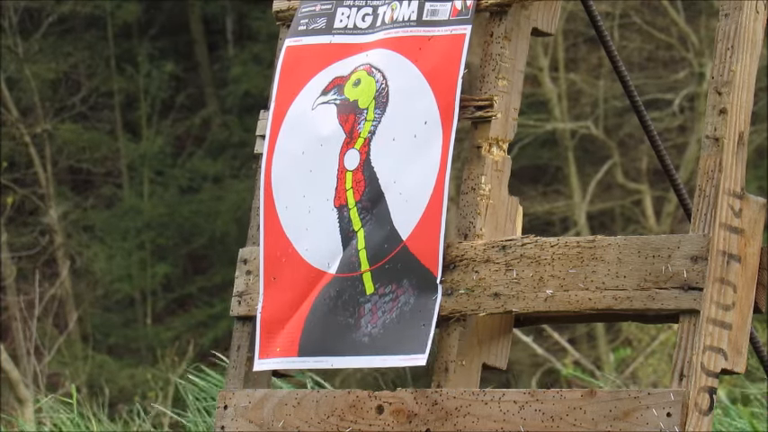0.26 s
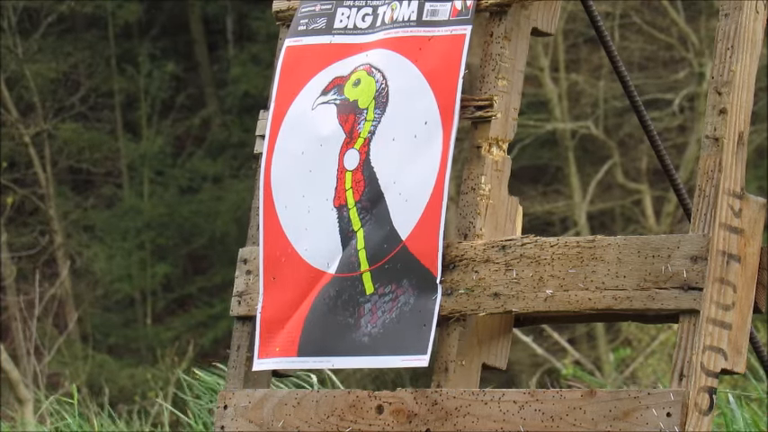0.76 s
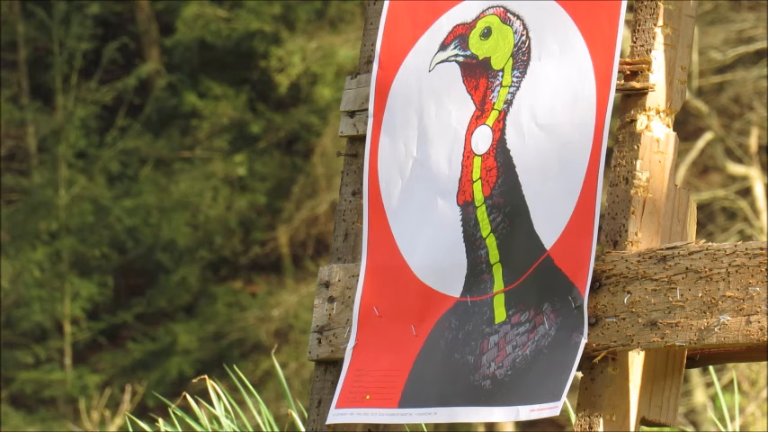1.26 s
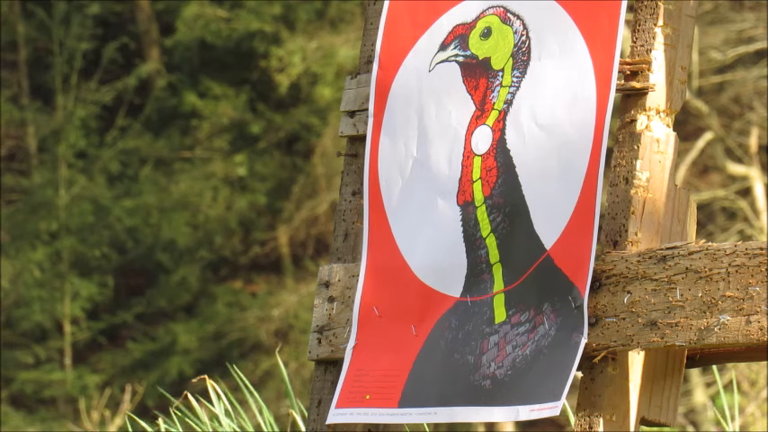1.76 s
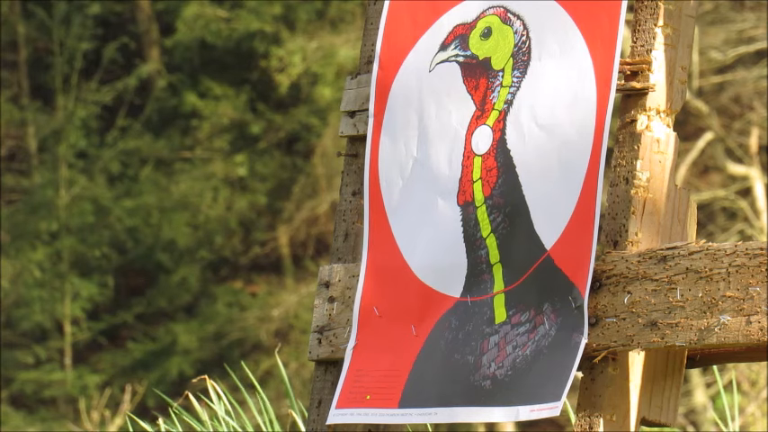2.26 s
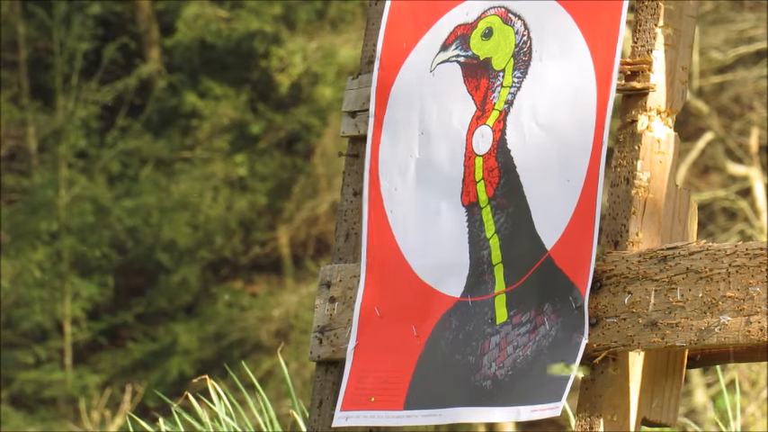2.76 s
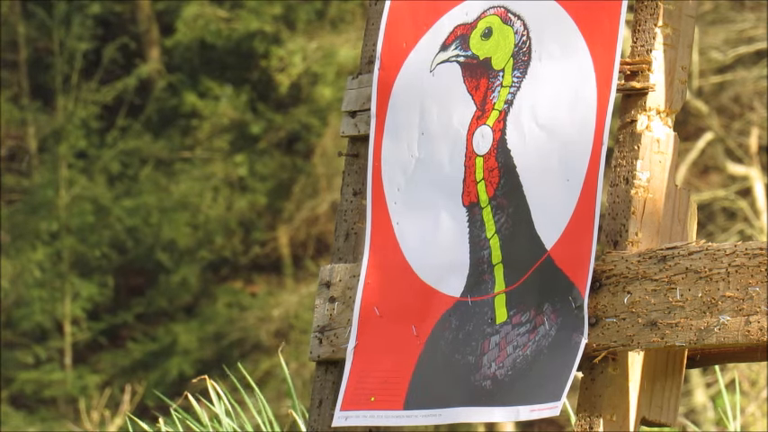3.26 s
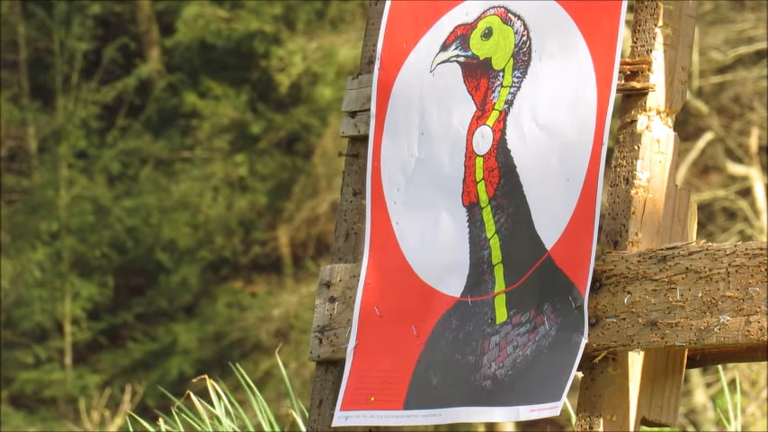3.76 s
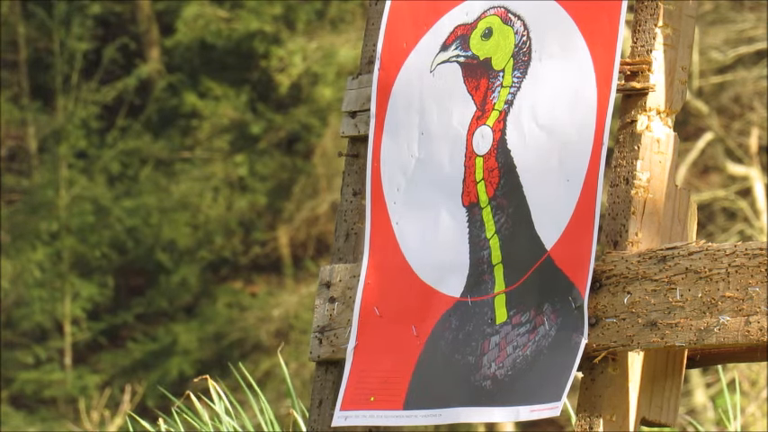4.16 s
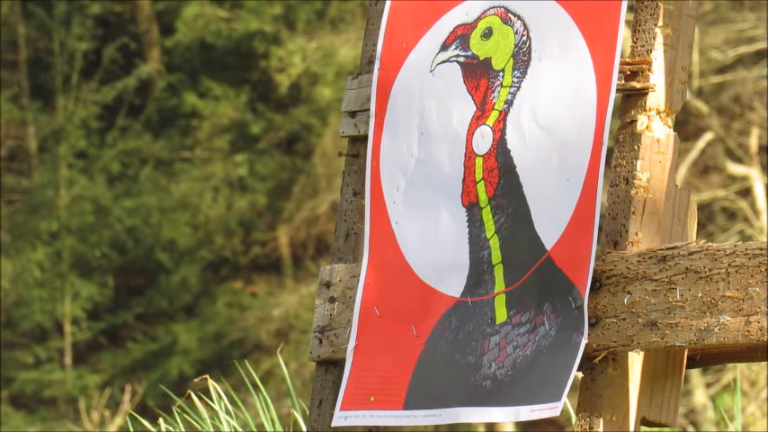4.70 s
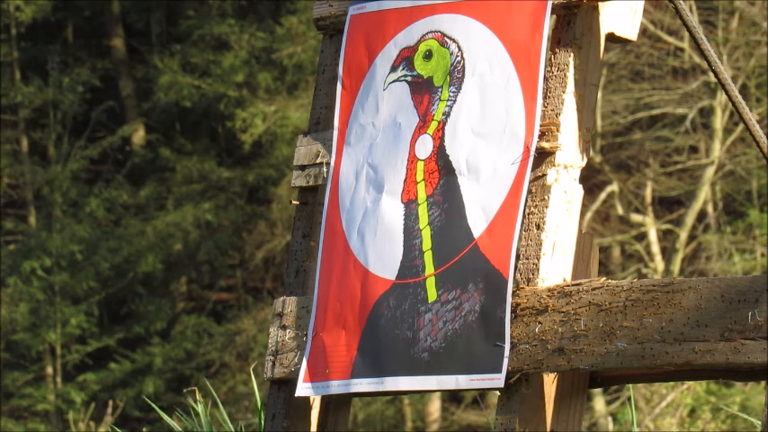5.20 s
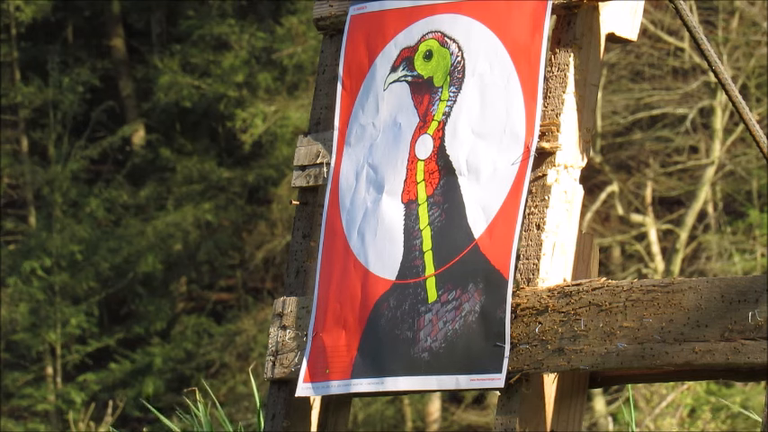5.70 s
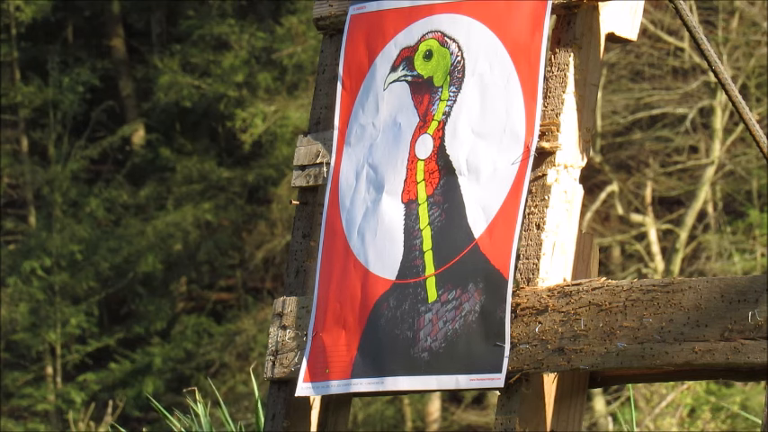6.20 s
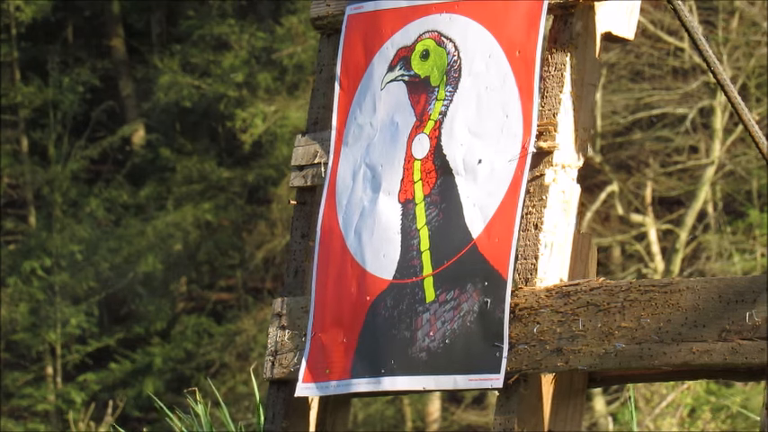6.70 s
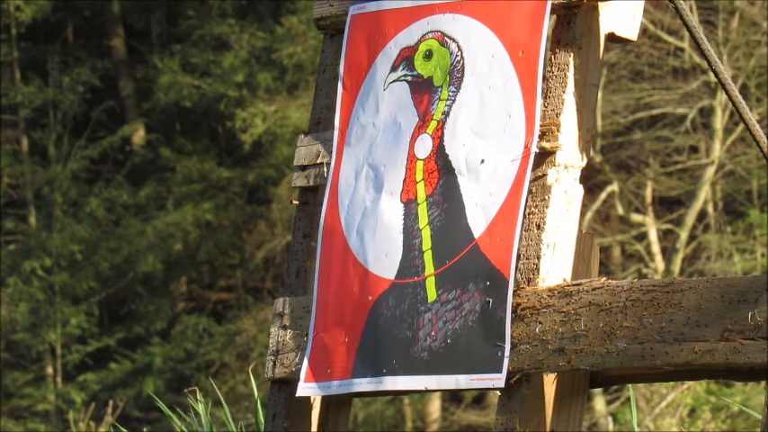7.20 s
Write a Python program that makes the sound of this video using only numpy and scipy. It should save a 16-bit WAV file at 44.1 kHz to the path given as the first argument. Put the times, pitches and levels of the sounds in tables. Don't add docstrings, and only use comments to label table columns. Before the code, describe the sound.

Wind buffets the microphone as an earlier gunshot's echo fades; two flintlock shotgun blasts strike a paper target, each rolling back through woods among birdsong.

```python
import sys
import numpy as np
from scipy import signal
from scipy.fft import rfft, irfft, next_fast_len
from scipy.io import wavfile

SR = 44100
rng = np.random.default_rng(int(sys.argv[2]) if len(sys.argv) > 2 else 0)


def put_to_file(sound):
    columns = np.atleast_2d(sound).T
    safe = np.clip(columns, -1, 1)
    whole_steps = np.round(safe * 32767)
    wavfile.write(sys.argv[1], SR, whole_steps.astype(np.int16))


def voltage_ratio(decibels):
    exponent = np.asarray(decibels, float) / 20
    return 10 ** exponent


N = 328545
TIME, PADDED = np.arange(N) / SR, next_fast_len(N)
BINS_HZ = np.maximum(np.fft.rfftfreq(PADDED, 1 / SR), 1)

# start_s, air_body_db, air_edge_db, air_rumble_db, hiss_db
VIEWS = [
    (0, -70, -67, -49, -67.5),
    (.901, -62, -68, -48, -67),
    (5.04, -58, -64.5, -47, -67),
]
# start_s, gain_db, recovery_db_per_s, breeze_db
GAIN_DROPS = [
    (0, -9, 9.0, -31),
    (.66, -10.5, 3.0, -30),
    (.901, -4.5, 4.5, -30),
    (2.06, -6.5, 1.5, -31),
    (2.53, -17.5, 3.8, -58),
    (5.04, -1.5, 3.0, -34),
    (6.25, -.4, 3.0, -43),
    (6.575, -17, 1.2, -63),
]
AIR_FOLLOWS = [0.46, 1, 1.15]
# near_trees_db, near_fade_db_per_s, slope_db, slope_fade_db_per_s
ROLL = [
    (-40.5, 15.5, -31, 15),
    (-54, 7.5, -39, 15.5),
    (-47, 16, -38.5, 41),
]
# pitch_hz, level_db (per Hz)
RUMBLE_TONE = [(24, -52.5), (40, -11), (113, 1), (278, -4), (428, -12.5), (495, -14), (531, -12.5),
               (700, -36.5), (910, -68), (1540, -120)]
# pitch_hz, level_db (per Hz)
BODY_TONE = [(420, -58), (720, -24.5), (794, -5.5), (1010, -2.5), (1300, -5), (1520, -5.5), (1880, -13),
             (2200, -19.5), (2860, -51.5), (4840, -120)]
# pitch_hz, level_db (per Hz)
EDGE_TONE = [(1300, -26), (1900, -2), (2300, 1.5), (3000, -3), (4500, -18), (6500, -30), (10000, -42.5)]
# pitch_hz, level_db (per Hz)
HISS_TONE = [(250, -7), (450, 10.5), (750, 11), (1500, -4.5), (3000, -6.5), (6000, -4), (11000, -4),
             (13000, -8), (15500, -16)]
# pitch_hz, likeness (-1 to 1)
LIKENESS = [(60, -.3), (130, .6), (290, .9), (640, .85), (1400, .93), (3100, .94), (6800, .45),
            (12000, -.1)]

# start_glide_hz_per_s, end_glide_hz_per_s
GLIDES = dict(whistle=(0, 0), slide=(-3300, -2100), flick=(95000, -42000), fall=(-19000, 5200),
          drop=(-5000, -36000), swoop=(-36000, 15200), rise=(11000, 13000), arch=(2500, -31000))
# start_s, length_s, first_pitch_hz, level_db
HELD_NOTES = dict( whistle=[(.902, 0.078, 2330, -57), (1.05, 0.072, 2330, -74), (4.52, .04, 2550, -81),
              (4.92, 0.027, 2250, -72), (5.245, 0.03, 3120, -70), (5.42, .045, 2130, -61),
              (5.896, 0.035, 2290, -59), (6.165, 0.014, 5780, -69), (6.25, .03, 3320, -63.5),
              (6.385, 0.057, 2250, -59), (6.524, 0.073, 2885, -51.5), (6.015, .1, 2900, -66)],
              slide=[(5.475, 0.16, 2100, -67), (5.885, 0.23, 2190, -62.5), (6.065, 0.05, 2860, -56.5),
              (6.416, 0.11, 2090, -62.5)], fall=[(5.183, 0.053, 3500, -63.5), (5.666, 0.059, 3560, -64.5),
              (6.135, 0.061, 3460, -60.5), (6.187, 0.07, 2950, -57.5)])
# start_s, length_s, first_pitch_hz, level_db
QUICK_NOTES = dict( flick=[(5.157, 0.038, 2500, -71), (5.641, 0.029, 2790, -58),
               (6.113, 0.028, 2650, -53.5)], drop=[(4.578, .047, 3830, -77), (4.762, .045, 3800, -76),
               (5.82, 0.038, 2980, -68), (5.983, 0.034, 4220, -60.5), (6.48, 0.031, 4280, -57.5)],
               swoop=[(6.32, .068, 2900, -56)], rise=[(4.535, .03, 4100, -77), (4.712, .028, 4100, -74),
               (5.768, .017, 3650, -63.5), (6.192, .038, 4580, -68), (6.28, .012, 3650, -62.5)],
               arch=[(4.202, .083, 4240, -79), (4.356, .08, 4320, -75)])

# start_s, length_s, eddy_peak_db, eddy_width_ms
GUSTS = [(0, 0.078, -20.5, 1.48), (0.137, 0.13, -13.5, 1.58), (0.268, .14, -14, 1.6),
         (0.461, .13, -12, 2.2), (.615, 0.097, -4.5, 2.1), (.72, .04, -12, 1.51), (0.801, 0.089, -9.5, 2.2),
         (1.031, .09, -14.5, 4.1), (1.253, 0.12, -14.5, 3.4), (1.41, 0.03, -10.5, 2.8),
         (1.508, 0.18, -23, 3.54), (1.934, 0.087, -31, 4), (2.058, 0.033, -6, 1.8),
         (2.201, 0.087, -17, 2.1), (2.326, 0.041, -16, 1.9), (2.44, 0.14, -25.5, 2.9),
         (3.61, .05, -25, 3.2), (4.10, .05, -30, 2.4), (5.158, 0.088, -38, 3.0), (5.699, 0.22, -21.5, 4.5),
         (5.929, 0.15, -18, 3.7)]
# pitch_hz, level_db (per Hz)
BUFFET_TONE = [(15, -51.5), (25, -7.5), (96, 0.5), (161, 1.5), (339, -19), (469, -17.5), (670, -40),
               (854, -34.5), (1200, -49), (1560, -80), (2640, -120)]
# start_s, peak_db, width_ms, left_right_db
PUFFS = [
    [(0.2502, -11.3, 1.8, -1.2), (0.5652, -12.1, 2.0, -3.3), (0.6236, -7.5, 2.2, -1.5),
     (0.7118, -5.0, 2.0, -0.8), (0.8959, -9.9, 2.4, -1.1), (1.2662, -13.4, 3.7, 1.2),
     (2.0642, -0.6, 2.0, -1.4), (2.0713, -6.8, 1.5, -6.6), (2.0933, -8.0, 1.6, 2.4),
     (2.254, -3.2, 1.7, -4.3), (5.7818, -13.7, 2.8, -4.0)],
    [(0.2081, -11.5, 1.1, -5.2), (0.3592, -9.6, 1.2, -1.1), (0.4919, -11.1, 1.0, -2.5),
     (0.655, -5.0, 3.0, -0.5), (0.665, -1.3, 1.3, -2.4), (0.6738, -1.5, 1.6, 2.2),
     (0.8305, -8.3, 2.4, -1.3), (0.8635, -6.1, 2.2, -2.6), (1.4449, -8.2, 2.3, 3.3),
     (2.0805, -3.0, 1.6, 1.6), (5.9478, -7.3, 2.5, 4.2), (6.0126, -5.6, 2.2, 3.6)],
]
# start_s, peak_db, width_ms,
# left_right_db
SLAPS = [
    [(2.0638, -19, 2.6, -20)],
    [(.6650, -33, 2.2, -20)],
]
EDDY_GAP_WIDTHS = 6.5

# start_s, peak_db, low_edge_hz
TICKS = [(.215, -58, 6000), (.621, -57, 5000), (.819, -55, 8000), (.901, -35, 500), (2.753, -50, 7000),
         (2.795, -38, 7000), (2.811, -38, 3500), (5.040, -41, 700)]

# start_s, flash_lead_s, pellet_delay_s
SHOTS = [
    (2.5277, .082, .0690),
    (6.5756, .088, .0620),
]
# flash_db, muzzle_crackle_db, frame_ring_db, pellet_db
CHARGE = [
    (-49, -7, -16.5, -21.5),
    (-44.5, -19, -23, -21),
]
SWARM_RISE_S = [
    .0008,
    .003,
]
# pitch_hz, level_db (per Hz)
FLASH_TONE = [(1500, -10.5), (3000, 2.5), (6000, -1.5), (10000, 2), (15500, -6)]
# pitch_hz, level_db (per Hz)
PELLET_TONE = [(290, -39), (500, -10.5), (748, -35), (1090, -16.5), (2360, -8.5), (2650, -5.5), (5670, -11),
               (9790, -13), (15500, -21)]
# pitch_hz, level_db (per Hz)
SCATTER_TONE = [(35, -25), (60, -5), (305, 2.5), (721, -35), (869, -15), (1170, -23.5), (1480, -15.5),
                (4030, -17), (8470, -16.5), (13500, -22), (15500, -31.5)]
# pitch_hz, t60_s
FIRST_T60 = [(100, 0.098), (1000, 0.19), (4000, 0.08), (15000, .12)]
# pitch_hz, t60_s
LATER_T60 = [(100, 0.92), (1000, 1.3), (4000, 0.74), (15000, 0.4)]
# pitch_hz, level_db, t60_s, sign
BLAST_MODES = [(139, 2.4, .029, 1), (281, -4.0, .034, -1), (389, 13.4, .0048, -1), (1050, -10, .018, -1)]
# delay_s, level_db, sign
ARRIVALS = [
    (0, 0, 1),
    (.0019, -3.9, 1),
    (.0025, 1.1, 1),
    (.0113, -13, -1),
    (.0156, -22, -1),
]
# delay_s, level_db
FAR_ECHOES = [(.229, -38.5), (0.464, -41), (0.568, -39), (0.591, -32), (.650, -35.5), (.702, -39),
              (.827, -30.5), (1.15, -39)]


def at_hz(points, hz):
    table = np.array(points)
    return np.interp(np.log(hz), np.log(table[:, 0]), table[:, 1])


def rms_one(x):
    return x / np.sqrt(np.mean(x ** 2) + 1e-20)


def filtered(order, edges_hz, kind, x):
    return signal.sosfilt(signal.butter(order, edges_hz, kind, fs=SR, output="sos"), x)


def drift(rate_hz):
    spectrum = rfft(rng.standard_normal(PADDED)) / (1 + (BINS_HZ / rate_hz) ** 2)
    return rms_one(irfft(spectrum, PADDED)[:N])


def colour(x, tone):
    return rms_one(irfft(rfft(x, PADDED) * voltage_ratio(at_hz(tone, BINS_HZ)), PADDED)[..., :N])


def wide_white():
    mid, side = rfft(rng.standard_normal((2, PADDED)))
    alike = np.clip(at_hz(LIKENESS, BINS_HZ), -1, 1)
    ports = np.sqrt(1 + alike) * mid + np.sqrt(1 - alike) * side * [[1], [-1]]
    return irfft(ports, PADDED)[:, :N]


def dying(start, t60, rise):
    age = np.maximum(TIME - start, 0)
    return (1 - np.exp(-age / rise)) * voltage_ratio(-60 * age / t60)


def auto_gain():
    drops = np.array(GAIN_DROPS)
    start, gain_db, recovery, breeze_db = drops[np.searchsorted(drops[1:, 0], TIME)].T
    return np.minimum(gain_db + recovery * (TIME - start), 0), breeze_db


def roll(near_db, near_fade, slope_db, slope_fade):
    earlier_shot_s, hill_s, hill_swell_s = -1.175, .43, .19
    starts = [earlier_shot_s] + [shot[0] for shot in SHOTS]
    ends = [view[0] for view in VIEWS[1:]] + [N / SR]
    power = 0
    for start, end in zip(starts, ends):
        age = np.maximum(TIME - start, 0)
        late = np.maximum(TIME - start - hill_s, 0)
        near = voltage_ratio(near_db - near_fade * age) * np.clip((age - .08) / .1, 0, 1)
        slope = voltage_ratio(slope_db - slope_fade * late) * (1 - np.exp(-(late / hill_swell_s) ** 2))
        power = power + (near ** 2 + slope ** 2) * (TIME < end)
    return power


def woods():
    gain_db = auto_gain()[0]
    views = np.array(VIEWS)
    body_db, edge_db, rumble_db, hiss_db = views[np.searchsorted(views[1:, 0], TIME), 1:].T
    air = zip(ROLL, [rumble_db, body_db, edge_db], AIR_FOLLOWS)
    rumble, body, edge = [np.sqrt(roll(*echo) + voltage_ratio(air_db + share * gain_db) ** 2)
                          for echo, air_db, share in air]
    scraps = sum(voltage_ratio(db) * dying(shot[0] + .087, 1.2, .027) for shot, db in zip(SHOTS, [-56, -66]))
    hiss = np.hypot(voltage_ratio(hiss_db + gain_db), scraps)
    patches = 1.4 * drift(11)
    out = body * voltage_ratio(patches + drift(9.7)) * colour(wide_white(), BODY_TONE)
    out += edge * voltage_ratio(patches - 4) * colour(wide_white(), EDGE_TONE)
    out += rumble * voltage_ratio(1.3 * drift(4)) * colour(wide_white(), RUMBLE_TONE)
    return out + hiss * voltage_ratio(5.5) * colour(wide_white(), HISS_TONE)


def birds():
    far_bird_db = -72
    dry, heard = np.zeros((2, N))
    for kind, notes in [*HELD_NOTES.items(), *QUICK_NOTES.items()]:
        first_glide, last_glide = GLIDES[kind]
        for start, length, first_hz, db in notes:
            part = slice(round(start * SR), round((start + length) * SR))
            along = (TIME[part] - start) / length
            mean_glide = first_glide + (last_glide - first_glide) * along / 2
            hz = first_hz + length * along * mean_glide
            shape = np.clip(np.minimum(along, 1 - along) / .15, 0, 1)
            note = voltage_ratio(db + 4.5) * shape * np.sin(2 * np.pi * np.cumsum(hz) / SR)
            deep = db < far_bird_db
            dry[part] += note * voltage_ratio(1.5 * deep)
            heard[part] += note * voltage_ratio(-1.5 * deep)
    age = np.arange(SR // 2) / SR
    trees = rng.standard_normal((2, len(age))) * voltage_ratio(-60 * age / .7)
    trees /= np.sqrt(np.sum(trees ** 2, axis=1, keepdims=True))
    echo = np.roll(dry, round(.043 * SR))
    wet = signal.fftconvolve(dry[None], trees)[:, :N]
    haze = rms_one(filtered(2, [2500, 2950], "band", wide_white()))
    wet += voltage_ratio(-62) * haze * dying(VIEWS[1][0], .9, .0019)
    return heard * voltage_ratio(2.5 * drift(40)) + voltage_ratio(-11) * echo + voltage_ratio(-2.5) * wet


def gusts():
    strength, eddies = voltage_ratio(auto_gain()[1]), [[], []]
    for start, length, db, width_ms in GUSTS:
        outside = np.maximum(np.maximum(2 * (start - TIME), TIME - start - length), 0)
        strength = strength + voltage_ratio(db - 11) * np.exp(-(outside / .01) ** 2)
        gap, size, lean, turn = rng.standard_normal((4, 16))
        usual_gap_s = EDDY_GAP_WIDTHS * width_ms / 1000
        s = start + .01 + np.cumsum(usual_gap_s * np.exp(.3 * gap)) - usual_gap_s
        for k in np.flatnonzero(s < start + length):
            direction = (k + (turn[k] > 1)) % 2
            peak_db = db + 2 * (size[k] - 1)
            eddy_ms = width_ms * np.exp(.15 * turn[k])
            eddies[direction].append((max(s[k], .0095), peak_db, eddy_ms, -1.97 + 2.5 * lean[k]))
    return 20 * np.log10(strength), eddies


def wind():
    port_lag_s = .00012
    gust_db, runs = gusts()
    gust_db = gust_db - 5 + 2 * drift(5.6)
    gust_db -= 15 * (TIME > .901) * (TIME < .97)
    across, common = [colour(rng.standard_normal(N), BUFFET_TONE) for port in range(2)]
    lean = voltage_ratio(2.19 * drift(6.5))
    common = filtered(1, 200, "high", common)
    lumpy = np.array([across * lean, -across / lean]) + voltage_ratio(-9.5) * common
    dull = filtered(2, 170, "low", lumpy)
    brightness = voltage_ratio(np.minimum(.44 * (gust_db + 24), 0))
    buffet = voltage_ratio(gust_db) * (dull + (lumpy - dull) * brightness)
    puffs = np.zeros((2, N))
    age = np.arange(-400, 600) / SR
    layers = [buffet] * 2 + [puffs] * 4
    for sign, layer, eddies in zip([1, -1] * 3, layers, runs + PUFFS + SLAPS):
        for s, db, width_ms, pan_db in eddies:
            phase = (age - port_lag_s * np.array([[0], [1]])) / (width_ms / 1400)
            part = slice(round(s * SR) - 400, round(s * SR) + 600)
            buffet[:, part] *= 1 - .65 * np.exp(-phase ** 2 / 8)
            puff = sign * voltage_ratio(db) * np.exp(-phase ** 2 / 2) * (1 - .9 * phase ** 2 + .2 * phase)
            layer[:, part] += puff * voltage_ratio([[pan_db / 2], [-pan_db / 2]]) * [[1], [-1]]
    return buffet + puffs


def ticks():
    out, length = np.zeros((2, N)), 300
    for s, db, low_hz in TICKS:
        noise = rng.standard_normal(length) + .6 * rng.standard_normal((2, length))
        burst = noise * voltage_ratio(db - 60 * np.arange(length) / SR / .004)
        start = round(s * SR)
        out[:, start:start + length] += filtered(2, [low_hz, min(6 * low_hz, 16000)], "band", burst)
    return out


def scatter():
    out, noise = np.zeros((2, N)), colour(wide_white(), SCATTER_TONE)
    edges = np.geomspace(85, 16000, num=14)
    for s, lead, delay in SHOTS:
        part = slice(round(s * SR), round(s * SR) + SR)
        age = TIME[part] - s
        emerging = 1 - np.exp(-(age / .0086) ** 3)
        for k, (low, high) in enumerate(zip(edges, edges[1:])):
            band = filtered(2, [low, high], "band", noise[:, part])
            hz = np.sqrt(low * high)
            first = voltage_ratio(-19 - 60 * age / at_hz(FIRST_T60, hz))
            later = voltage_ratio(-34 - 60 * age / at_hz(LATER_T60, hz)) * np.clip(20 * (.9 - age), 0, 1)
            out[:, part] += (-1) ** k * band * (first + later) * emerging
    return out


def flash_and_pellets():
    white = wide_white()
    hits = rng.random(N) < 16000 / SR
    grains = voltage_ratio(2 * np.minimum(rng.exponential(1, N), 3)) * hits
    hiss, patter = colour(white, FLASH_TONE), colour(white * grains, PELLET_TONE)
    frame_hz, frame_width_hz = 1850, 600
    band = [frame_hz - frame_width_hz / 2, frame_hz + frame_width_hz / 2]
    ring = rms_one(filtered(1, band, "band", white))
    out = 0
    for (s, lead, delay), levels_db, spread in zip(SHOTS, CHARGE, SWARM_RISE_S):
        flash_db, crackle_db, frame_db, pellet_db = levels_db
        out = out + voltage_ratio(flash_db) * hiss * dying(s - lead, .29, .008) * (TIME < s)
        out = out + voltage_ratio(crackle_db) * patter * dying(s, .03, .0003) * (TIME < s + .0025)
        out = out + voltage_ratio(frame_db) * ring * dying(s + .0115, .059, .001)
        hit = s + delay
        swarm_end = 1 + np.exp(np.clip((TIME - hit - .017) / .003, -50, 50))
        swarm = dying(hit, .15, spread) / swarm_end
        stragglers = voltage_ratio(-6.5) * dying(hit, .13, .004)
        out = out + voltage_ratio(pellet_db) * patter * (swarm + stragglers)
    return out


def blast():
    ground_dip_hz = 700
    age = np.arange(SR // 10) / SR
    boom_db = np.array([[-2.5], [1.5]])
    wave = 0
    for hz, db, t60, sign in BLAST_MODES:
        ring = voltage_ratio(db - 60 * age / t60 + boom_db * (hz < 200))
        wave = wave + sign * ring * np.sin(2 * np.pi * hz * age)
    near, far = np.zeros((2, N + SR))
    for s, lead, delay in SHOTS:
        for lag, db, sign in ARRIVALS:
            near[round((s + lag) * SR)] += sign * voltage_ratio(db)
        for lag, db in FAR_ECHOES:
            far[round((s + lag) * SR)] += voltage_ratio(db)
    far = filtered(2, 2500, "low", far)
    far = far + np.roll(far, round(SR / ground_dip_hz / 2))
    return signal.fftconvolve((near + far)[None, :N], wave)[:, :N]


def scene():
    return woods() + birds() + wind() + ticks() + scatter() + flash_and_pellets() + blast()


def band_limit(x):
    return signal.sosfilt(signal.butter(12, 15670, fs=SR, output="sos"), x)


def record(dry):
    clipped = np.clip(dry, -.99, .99)
    mix = signal.sosfilt(signal.cheby2(10, 50, 15900, fs=SR, output="sos"), clipped)
    return band_limit(mix)


dry = scene()
out = record(dry)
put_to_file(out)
```